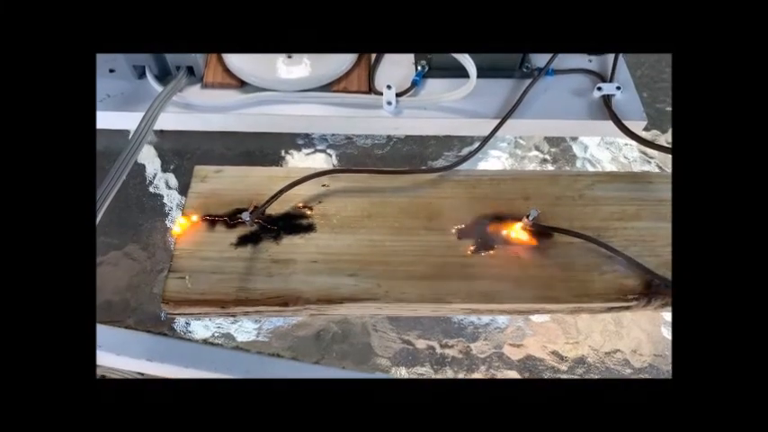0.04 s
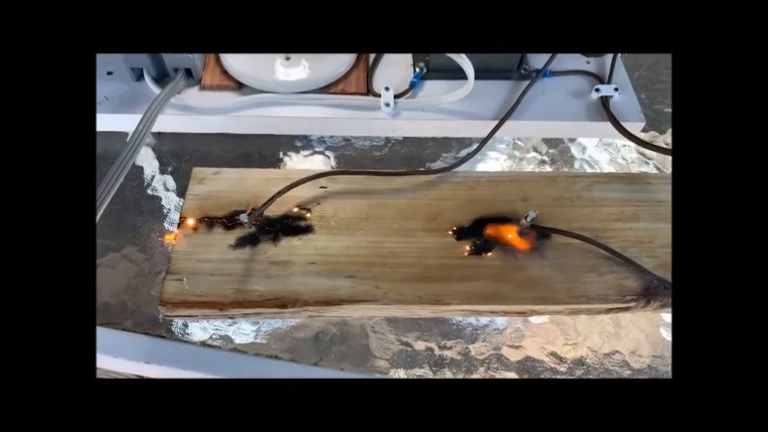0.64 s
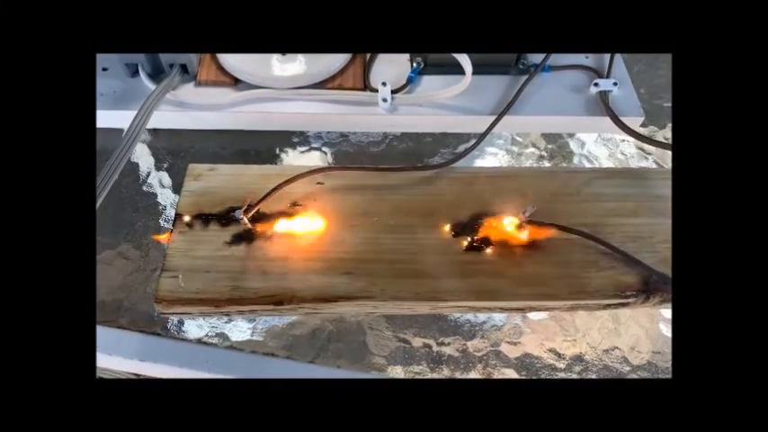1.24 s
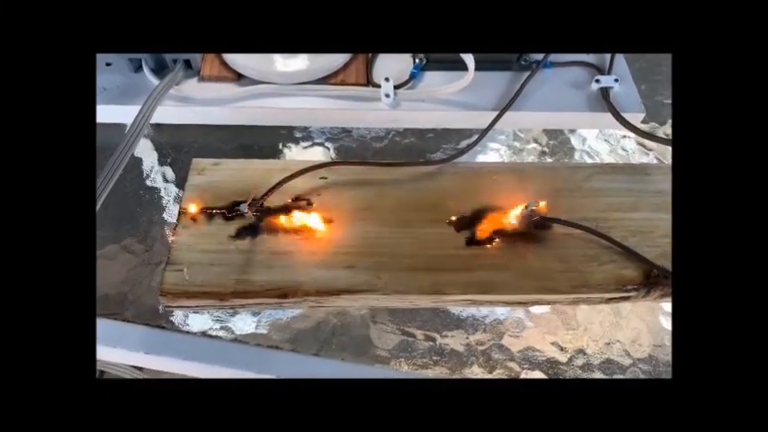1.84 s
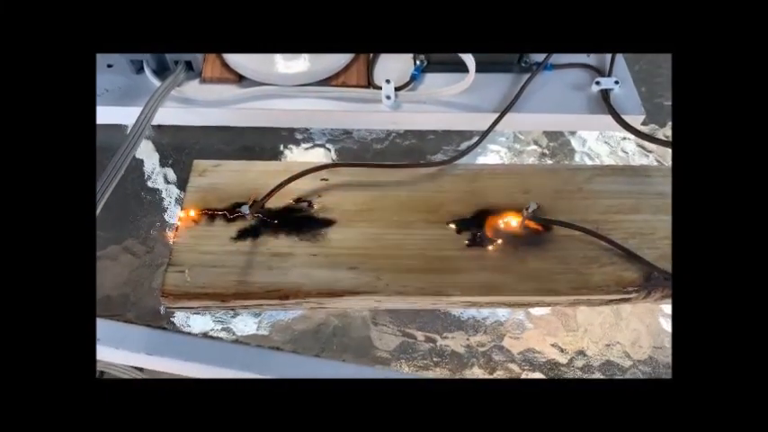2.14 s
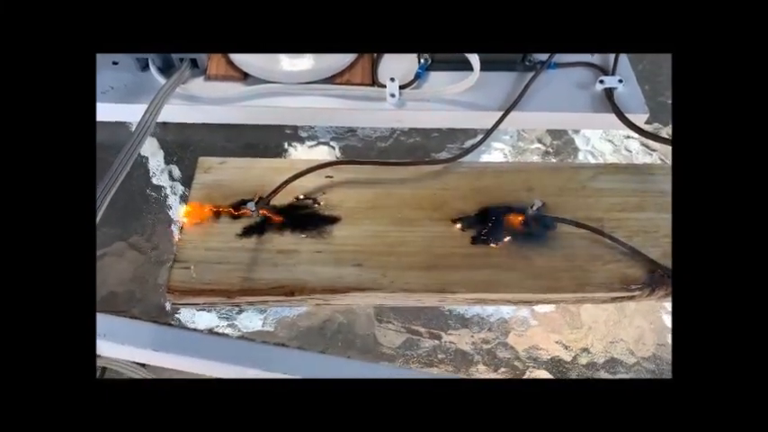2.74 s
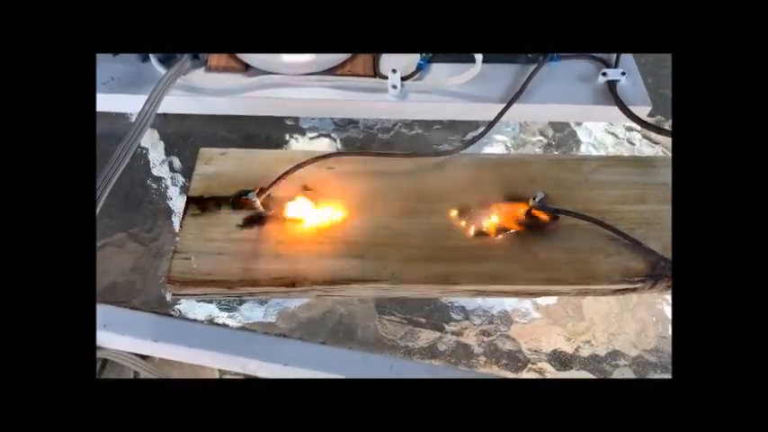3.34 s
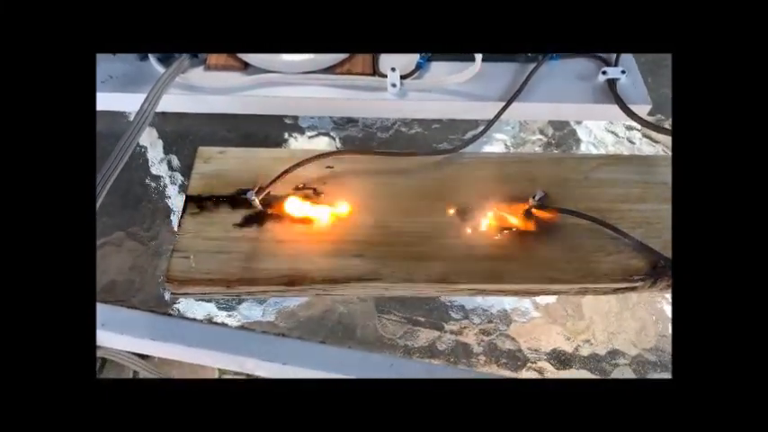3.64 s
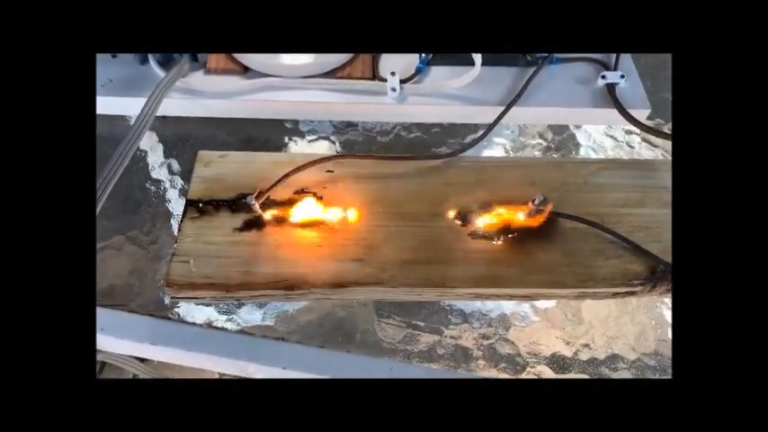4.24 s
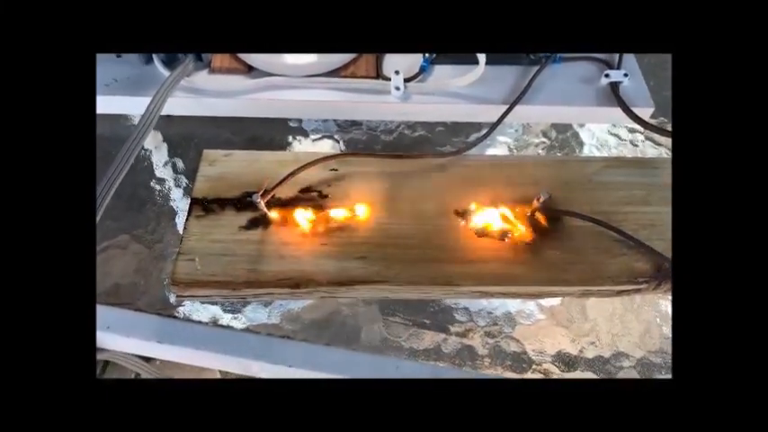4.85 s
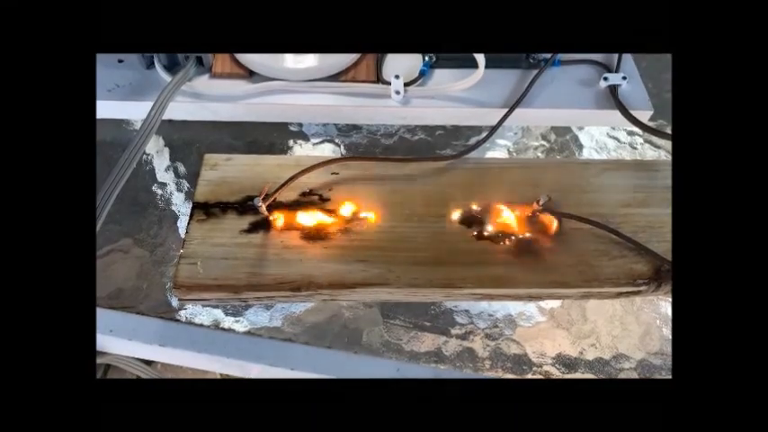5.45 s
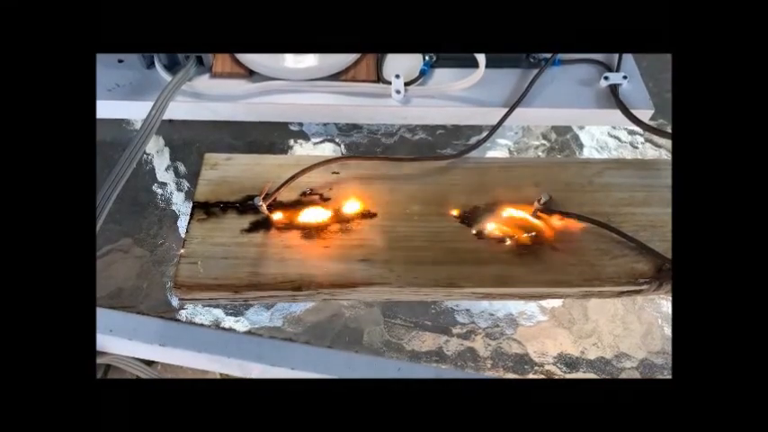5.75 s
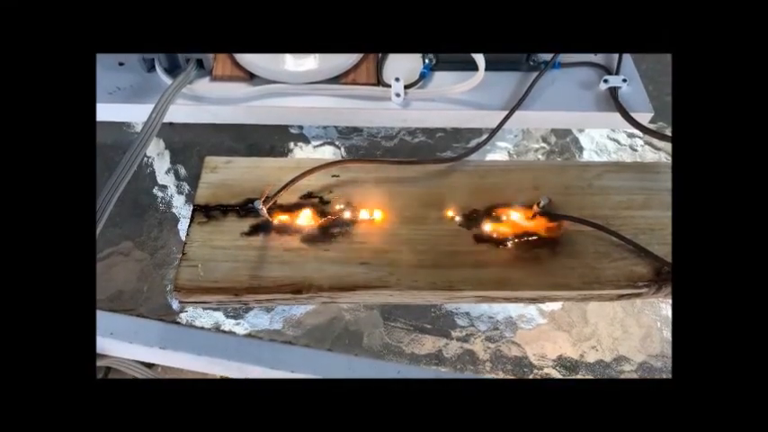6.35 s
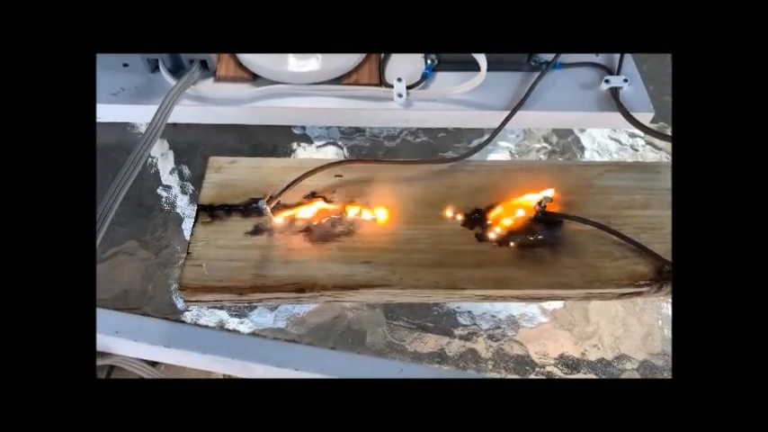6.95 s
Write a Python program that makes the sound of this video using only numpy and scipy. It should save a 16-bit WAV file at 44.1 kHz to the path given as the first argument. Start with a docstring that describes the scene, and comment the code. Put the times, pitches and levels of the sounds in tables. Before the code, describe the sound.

Close up in a small room, charred wood sizzles quietly over the low hum of a transformer. An electric arc breaks out with a loud, spitting buzz and a fluttering flame, dies back to a sizzle, then flares again in a longer, uneven burn that lasts to the end. Sharp cracks snap out at irregular moments. A very faint fan and room hiss lie behind, with almost no echo.

```python
"""A small room, a glass table: high voltage burns tracks into a wet board, heard from close above.
Twice every mains cycle the gap breaks down in a spray of sparks and the heated air thumps.
The arc flares up, falls back to a sizzle in the char and flares again; heavy breakdowns snap out.
Underneath, the transformer hums over a faint fan and room noise."""
import sys
import numpy as np
from scipy import signal
from scipy.fft import rfft, irfft, next_fast_len
from scipy.io import wavfile

SR = 44100
rng = np.random.default_rng(int(sys.argv[2]) if len(sys.argv) > 2 else 0)


def to_wav(s):
    """Save 16-bit WAV."""
    ch = np.atleast_2d(s).T  # columns
    pcm = np.round(np.clip(ch, -1, 1) * 32767)  # PCM
    wavfile.write(sys.argv[1], SR, pcm.astype(np.int16))


N = 317961
TIME = np.arange(N) / SR
FREQ = np.maximum(np.fft.rfftfreq(2 * next_fast_len(N // 2 + 4096), 1 / SR), 1)
MAINS_HZ = 60
ARC_REF_DB, SIZZLE_REF_DB = -31, -41


# Arc open as a flame: strike t/s, quench t/s, current offset/dB
FLARES = [(0, .025, -4), (.612, .64, -3), (.762, 1.888, 0), (1.96, 2.058, 0), (2.84, 2.858, -7),
          (3.228, 7.22, 0)]

def flares():
    """Each flare strikes fast, holds and is quenched. Returns openness 0-1, current offset and age."""
    strike_s, quench_s = 0.012, 0.017
    flame, offset_db, age_s = np.zeros((3, N))
    for start, end, db in FLARES:
        shape = np.clip(np.minimum((TIME - start) / strike_s, 1 - (TIME - end) / quench_s), 0, 1)
        flame = np.maximum(flame, shape)
        offset_db = np.where(shape > 0, db, offset_db)
        age_s = np.where(shape > 0, TIME - start, age_s)
    return flame, offset_db, age_s


# Arc current in the two long burns: t/s, level/dB
FIRST_BURN = [(0.8, -29.5), (1.588, -31), (1.662, -31.5), (1.686, -30.5), (1.88, -30.5)]
SECOND_BURN = [(3.56, -30.5), (3.64, -31.5), (3.86, -31.5), (4.22, -32), (4.25, -32), (4.35, -31.5),
               (4.46, -33), (4.71, -30), (4.88, -30), (5.04, -29.5), (5.36, -33), (5.64, -31), (5.7, -32),
               (6.24, -33.5), (6.27, -31.5), (6.35, -35), (6.58, -32.5), (6.62, -36.5), (6.72, -34.5),
               (6.77, -36), (6.95, -32.5), (6.98, -31), (7.18, -32)]
# Current dips: t/s, gain/dB
STALLS = [(1.37, -1), (1.64, -1), (3.513, -4.5)]

def arc_current():
    """The open arc draws an uneven current and briefly falters. In dB re ARC_REF_DB."""
    stall_s = 0.022
    dips_db = sum(db * gaussian(TIME - s, stall_s) for s, db in STALLS)
    return curve(FIRST_BURN + SECOND_BURN) - ARC_REF_DB + dips_db


# Spark spectra, in the open flame and in charred wood: f/Hz, density/dB
FLAME_SPARKS = [(600, -38), (1500, -13.5), (2400, -10), (3200, -12), (4200, -8), (5500, -7), (6500, -6.5),
                (7500, -4.5), (9500, -2), (11500, -4.5), (13000, -4), (15300, -5)]
CHAR_SPARKS = [(600, -12), (1500, -27), (2400, -8), (3200, -10.5), (4200, -9.5), (5500, -7.5), (7500, 0),
               (9500, -0.5), (13000, -0.5), (15300, -0.5)]

def crackle(flame, age_s):
    """Sparks spray at each voltage peak over a thin fizz. Returns flame crackle and char sizzle."""
    # reverse stroke re forward: lopsided when freshly struck, more even once settled
    fresh_db, settled_db, char_db, settle_s = -9, -2.5, -1.5, 0.77
    open_db = settled_db + (fresh_db - settled_db) * np.exp(-age_s / settle_s)
    reverse_gain = undb(flame * open_db + (1 - flame) * char_db + 3 * walk(13))
    phase = .228 + .04 * flame  # char sparks earlier in the cycle
    forward = bursts(phase, width_ms=1.29, scatter_db=2.5, jitter_ms=0.18)
    reverse = bursts(phase + .5, width_ms=1.17, scatter_db=2.04, jitter_ms=0.53)
    gate = unit((forward + reverse_gain * reverse + 0.14) / np.sqrt(1 + reverse_gain ** 2))
    spray = gate * sparks(per_s=16000, scatter_db=2.0)
    bright = groove(colour(spray, FLAME_SPARKS))
    return np.sqrt(flame) * bright, np.sqrt(1 - flame) * colour(spray, CHAR_SPARKS)


# Groove resonances: t/s, low ring/dB, high ring/dB
GROOVE_RINGS = [(0, 4, -30), (1.9, -2.5, -27), (3.3, -6.5, -12), (4.9, -18, -8), (5.7, -38, 2)]

def groove(x):
    """As the burnt groove widens, its low ring fades and a higher rasp takes over."""
    s, *rings_db = np.transpose(GROOVE_RINGS)
    low, high = (undb(np.interp(TIME, s, db)) for db in rings_db)
    return x + low * ring(x, hz=4290, width_hz=500) + high * ring(x, hz=5790, width_hz=190)


# Steps in spark level: t/s, gain/dB
SURGES = [(.765, -0.5), (1.38, 1), (1.96, -3), (3.232, 4), (3.43, 2.5), (4.515, 4.5), (5.27, 3.5),
          (5.75, 1.5), (6.4, 5), (6.85, 4.5)]

def surges():
    """The arc bites into fresh wood: the spark level jumps, mostly up, and returns as it chars. In dB."""
    fade_s = 0.45
    return sum(db * (TIME >= s) * np.exp(-np.abs(TIME - s) / fade_s) for s, db in SURGES)


# Spectra of the flame roar and of one knock on the board: f/Hz, density/dB
ROAR = [(150, -34), (350, -0.5), (550, 3), (900, -8), (1300, 0), (1550, -8.5), (1800, -1), (2100, -3),
        (3200, -6.5), (6000, -23)]
KNOCK = [(200, -15), (500, -8.5), (850, -6), (1250, -1), (1750, 1), (2100, -7), (3000, -13), (6000, -55)]

def roar():
    """The arc knocks on the forward stroke; each stroke puffs hot gas and ticks as it collapses."""
    puff = bursts(phase=0.35, width_ms=2.3, scatter_db=4.0, jitter_ms=1.0)
    back_puff = bursts(phase=0.71, width_ms=2.0, scatter_db=2, jitter_ms=.25)
    gas = colour((puff + 0.86 * back_puff + 0.96) * sparks(per_s=9000, scatter_db=-0.5), ROAR)
    strikes = sum(bursts(phase, width_ms=.1, scatter_db=3.5, jitter_ms=.45) for phase in (.27, .34))
    knocks = colour(strikes, KNOCK)
    knocks = unit(knocks + undb(1.5) * ring(knocks, hz=1296, width_hz=95))  # board resonance
    drying_db_per_s = .5  # a drier board knocks louder
    knocks = knocks * undb(drying_db_per_s * (TIME - TIME.mean()))
    late = bursts(phase=.925, width_ms=0.14, scatter_db=0.5, jitter_ms=0.088)
    early = bursts(phase=0.3937, width_ms=0.11, scatter_db=4.5, jitter_ms=0.11)
    ticks = colour(late - early, ROAR)
    shared = undb(-3.5) * gas[0] + undb(-4) * knocks + undb(-8) * ticks
    return np.array([shared, undb(1.5) * gas[1]])


# Heavy breakdowns: t/s, relative crack level/dB, relative pop level/dB
SNAPS = [(0.0204, -19, -24), (0.5443, -21, -35), (0.6205, -14, -28), (0.6387, -27, -43),
         (0.7692, -16.5, -39), (0.8063, -17, -32), (0.856, -16, -24), (0.9208, -20, -27.5),
         (0.9724, -16, -24), (1.154, -19, -23.5), (1.4866, -15.5, -25.5), (1.97, -19, -27.5),
         (1.9876, -13, -52), (2.8537, -21.5, -28.5), (3.2385, -15.5, -50), (3.253, -13, -38),
         (3.2716, -14, -24), (3.5385, -14, -31), (3.6386, -35, -20.5), (4.038, -21, -35), (4.236, -20, -27),
         (4.522, -17.5, -44), (4.72, -12.5, -30), (4.8035, -15, -24), (4.9629, -23, -43),
         (5.1533, -16, -38), (5.2718, -17, -26), (5.3545, -14.5, -32.5), (6.4036, -19.5, -44),
         (6.5378, -17, -40), (6.8625, -13, -38), (6.954, -20, -45), (7.072, -15, -40)]

def snaps():
    """A heavy breakdown is a dense knot of sparks with a pop of hot gas just behind it."""
    crack, pop = np.zeros((2, N))
    pop_lag_s = .0004
    for s, crack_db, pop_db in SNAPS:
        near = slice(max(int(s * SR) - 512, 0), int(s * SR) + 512)
        crack[near] += undb(crack_db) * gaussian(TIME[near] - s, sigma_s=0.001)
        pop[near] += undb(pop_db) * gaussian(TIME[near] - s - pop_lag_s, sigma_s=0.0017)
    cracks = crack * colour(sparks(per_s=24000, scatter_db=3.1), FLAME_SPARKS)
    pops = pop * colour(rng.standard_normal((2, N)), ROAR)
    return undb(1.5) * (cracks + pops)


# Sizzle, one list per lull: t/s, relative level/dB
SMOULDER = [
    [(0.06, -43), (0.15, -36), (0.28, -40.5), (0.426, -45), (0.59, -36.5)],
    [(2.12, -43), (2.322, -45), (2.476, -39.5), (2.81, -43.5), (2.82, -40)],
    [(2.89, -41), (2.974, -37), (3.03, -44.5), (3.07, -44), (3.2, -44.5)],
]

def smoulder():
    """Between flares the sizzle in the charred tracks swells and sinks. In dB."""
    return curve(np.vstack(SMOULDER))


# Transformer harmonics, idle and with the arc burning: f/MAINS_HZ, relative level/dB
IDLE_HUM = [(2, 3.5), (3, -21), (4, -5), (6, -9), (8, -17), (10, -17.5), (12, -22.5), (14, -34), (16, -31)]
ARC_HUM = [(1, -18), (2, 2), (3, -9.5), (4, -4), (5, -36), (6, -12), (7, -18), (8, -8.5), (9, -18),
           (10, -21), (11, -21), (12, -28.5), (13, -20), (15, -23.5)]

def transformer(flame):
    """The mostly even harmonics of the hum gain odd ones when the lopsided arc burns."""
    idle = harmonics(IDLE_HUM, phase=.09, sweep=.005)
    loaded = harmonics(ARC_HUM, phase=.112, sweep=.006)
    return ((1 - flame) * idle + flame * loaded) * undb(0.22 + .5 * walk(25))


# Hot-air spectrum: f/Hz, density/dB
FLUTTER = [(20, -16), (40, -5), (65, 2.5), (110, 0), (170, 2.5), (260, -0.5), (400, -5.5), (600, -5.5),
           (1000, -24), (2500, -60)]

def hot_air(flame):
    """Heated air flutters low, more strongly around the open flame."""
    return colour(rng.standard_normal((2, N)), FLUTTER) * undb(-13.0 + 2.5 * flame)


def fan():
    """A fan drones on one faint, wavering tone."""
    hz, level_db = 80.7, -53.5
    return undb(level_db + 2 * walk(3.1)) * unit(np.sin(2 * np.pi * hz * TIME + .5 * walk(2.8)))


# Room spectrum: f/Hz, density/dB
ROOM = [(20, -12), (45, -11), (80, 1.5), (170, -3), (300, -11), (600, -16.5), (1500, -13), (5000, -17.5)]

def room_noise():
    """Steady low rumble and hiss."""
    return undb(-44.5) * colour(rng.standard_normal((2, N)), ROOM)


def reflections(x, t60_s, wet_db):
    """Table and walls return a short diffuse tail."""
    age_s = TIME[:SR // 3]
    tail = rng.standard_normal((2, len(age_s))) * np.exp(-np.log(1000) * age_s / t60_s) * (age_s > .002)
    tail /= np.sqrt(np.sum(tail ** 2, axis=1, keepdims=True))
    return undb(wet_db) * signal.fftconvolve(x, tail, axes=1)[:, :N]


# Stereo image of arc and char: f/Hz, coherence 0-1, left lead/rad, left minus right/dB
ARC_IMAGE = [(35, .78, 0, .5), (120, .98, 0, 1.2), (300, .97, 0, .2), (800, .88, -.45, 1),
             (1400, .88, -.6, 1.5), (2050, .82, -2.7, 1), (2600, .95, -3.15, 0), (3100, .65, -3.4, 1),
             (3700, .4, -4.4, 2.5), (4600, .35, -5, 4), (6300, .4, -5.8, 1.2), (7500, .7, -5.1, 0),
             (9500, .92, -3.15, 0), (13000, .83, -.1, 0), (16000, .72, 2.7, 0)]
CHAR_IMAGE = [(40, 0.55, -1, -6), (250, 1, 1.5, -7), (800, 0.46, -0.5, -9), (1290, 0.62, -1, 0),
              (1980, 0.87, -5, -0.5), (3060, 0.43, -4, 2), (3920, 0.43, -4.5, 1.5), (5570, 0.44, -4.5, 3.5),
              (6600, 0.78, -6, -0.5), (9460, 0.78, -3.5, 0), (13100, 0.45, 0.5, 0), (16000, 0.94, 2.5, 1)]

def direct_sound(arc, char):
    """Sound reaches two ports with a lag and tilt by frequency. Row 0 feeds both, row 1 only the right."""
    stereo = np.zeros((2, N))
    for pair, image in ((arc, ARC_IMAGE), (char, CHAR_IMAGE)):
        hz, *columns = np.transpose(image)
        coherence, lead_rad, tilt_db = (np.interp(FREQ, hz, c) for c in columns)
        coherence = np.clip(coherence, 0, 1)
        left, other = spectrum(pair)
        right = coherence * left * np.exp(-1j * lead_rad) + np.sqrt(1 - coherence ** 2) * other
        stereo += irfft([left * undb(tilt_db / 2), right * undb(-tilt_db / 2)])[:, :N]
    return stereo


def sparks(per_s, scatter_db):
    """Two independent streams of tiny, uneven clicks, rms 1."""
    struck = rng.random((2, N)) < per_s / SR
    return unit(struck * rng.standard_normal((2, N)) * undb(scatter_db * rng.standard_normal((2, N))))


def bursts(phase, width_ms, scatter_db, jitter_ms):
    """One steep-sided swell per mains cycle at phase 0-1, each with its own size and delay."""
    cycles = TIME * MAINS_HZ - phase + 1
    nearest = np.round(cycles).astype(int)
    size, delay = rng.standard_normal((512, 2))[nearest].T
    offset_ms = (cycles - nearest) * 1000 / MAINS_HZ - jitter_ms * delay
    return undb(scatter_db * size) * np.exp(-.5 * np.abs(offset_ms / width_ms) ** 2.5)


def harmonics(orders, phase, sweep):
    """Mains harmonics as falling chirps: high ones lead, odd ones lie a quarter turn off."""
    cycles = TIME * MAINS_HZ - phase
    wave = np.zeros(N)
    for k, db in orders:
        turns = k * (cycles + sweep * k) + round(k) % 2 / 4
        wave -= undb(db) * np.cos(2 * np.pi * turns)
    return unit(wave)


def colour(x, points):
    """Filter by (f/Hz, gain/dB) points, then scale to rms 1."""
    hz, db = np.transpose(points)
    gain = undb(np.interp(np.log(FREQ), np.log(hz), db))
    return unit(irfft(spectrum(x) * gain)[..., :N])


def spectrum(x):
    """Padded spectrum on the FREQ grid."""
    return rfft(x, 2 * (len(FREQ) - 1))


def ring(x, hz, width_hz):
    """One resonance, peak gain 1."""
    return signal.lfilter(*signal.iirpeak(hz, hz / width_hz, SR), x)


def walk(per_s):
    """Random drift, spread near 1."""
    return np.interp(TIME * per_s, np.arange(2048), rng.standard_normal(2048))


def curve(rows):
    """Straight lines through (t/s, value) rows."""
    return np.interp(TIME, *np.transpose(rows))


def gaussian(offset_s, sigma_s):
    """Bell curve, peak 1."""
    return np.exp(-.5 * (offset_s / sigma_s) ** 2)


def undb(db):
    """dB to gain."""
    return 10 ** (np.asarray(db) / 20)


def unit(x):
    """Scale to rms 1."""
    return x / np.sqrt(np.mean(x ** 2))


def scene():
    """The current drives sparks, roar and hum; between flares they follow the smouldering char."""
    spark_slope, roar_slope, idle_slope = 1.48, 1.7, 0.3  # dB per dB
    flame, offset_db, age_s = flares()
    load_db = arc_current() + offset_db
    smoulder_db = smoulder()
    flicker_db = .8 * walk(22)
    spark_db = ARC_REF_DB + 3.5 + spark_slope * load_db + surges() + flicker_db
    roar_db = ARC_REF_DB - 3.5 + roar_slope * load_db + flicker_db
    idle_db = -38 + idle_slope * (smoulder_db - SIZZLE_REF_DB)
    roar_gain = flame * undb(roar_db) + (1 - flame) * undb(smoulder_db - 13.5)
    hum_gain = flame * undb(ARC_REF_DB + 1 + load_db) + (1 - flame) * undb(idle_db)

    bright, sizzle = crackle(flame, age_s)
    sizzle = sizzle * undb(smoulder_db + 5)
    arc = bright * undb(spark_db) + roar() * roar_gain + snaps()
    hum = transformer(flame) * hum_gain
    flutter = hot_air(flame) * hum_gain
    direct = direct_sound(arc + flutter, sizzle + room_noise())
    drone = (hum + fan()) * undb([[1.05], [-1.05]])  # slightly left
    return direct + reflections(arc + sizzle, t60_s=0.052, wet_db=-10) + drone


def record(dry):
    """A steep low-pass cuts the top."""
    cutoff_hz = 15900
    return signal.sosfilt(signal.ellip(10, .2, 80, cutoff_hz, fs=SR, output="sos"), dry)


dry = scene()
out = record(dry)
to_wav(out)
```